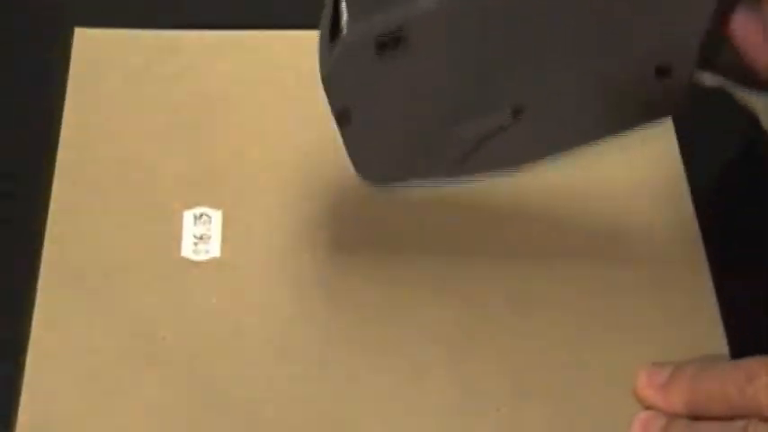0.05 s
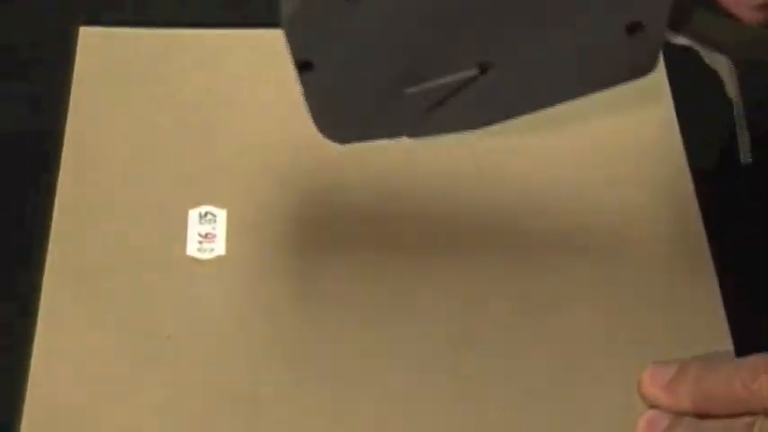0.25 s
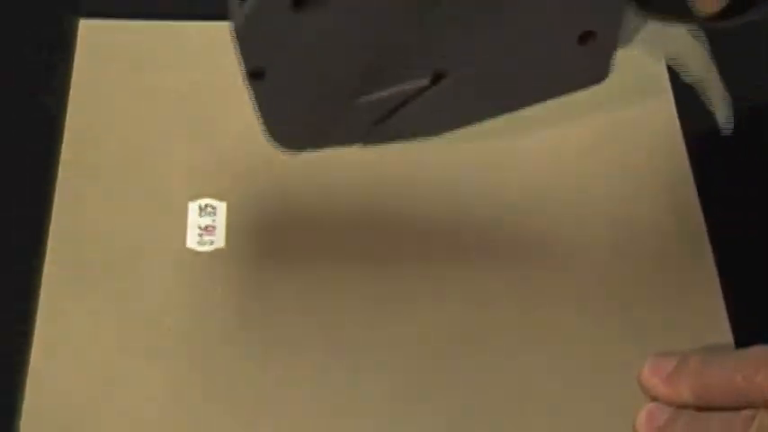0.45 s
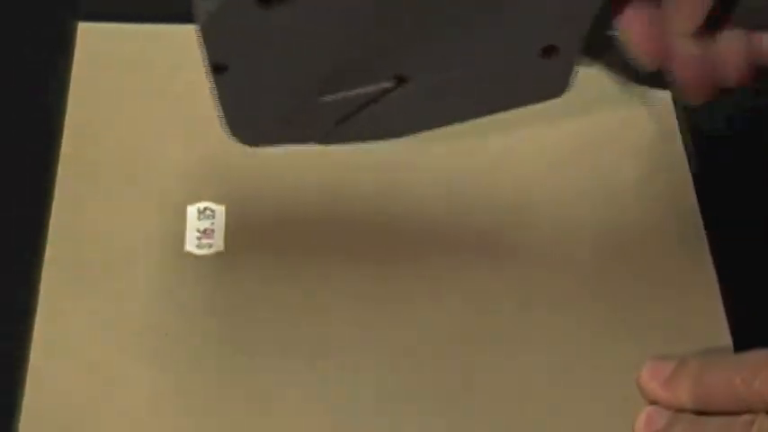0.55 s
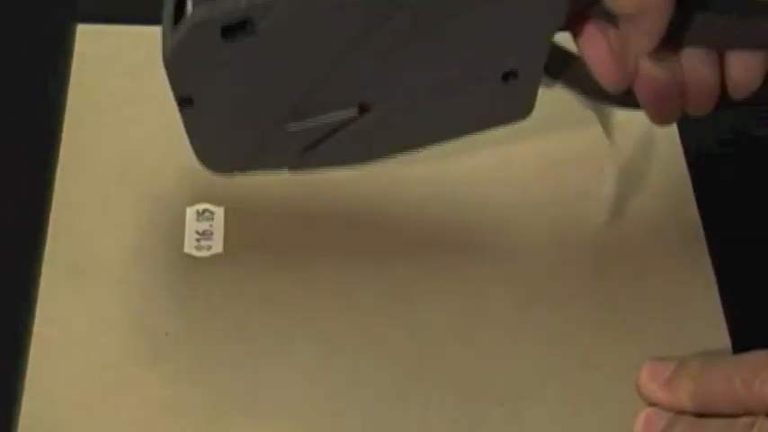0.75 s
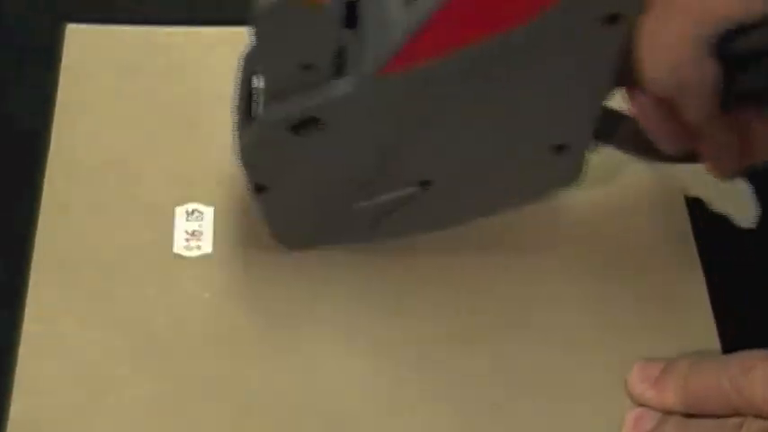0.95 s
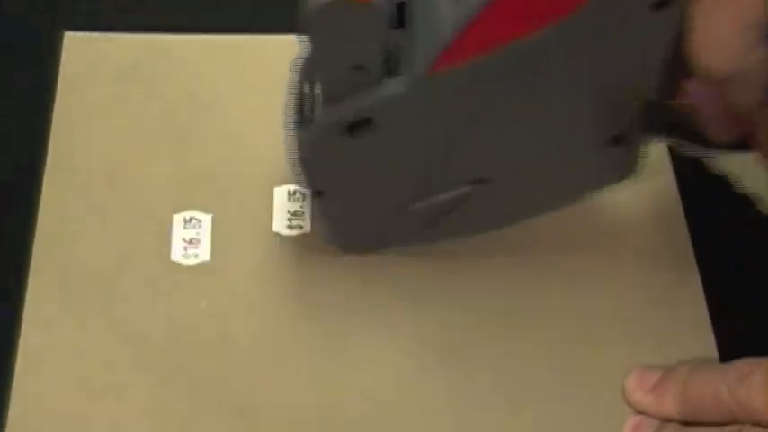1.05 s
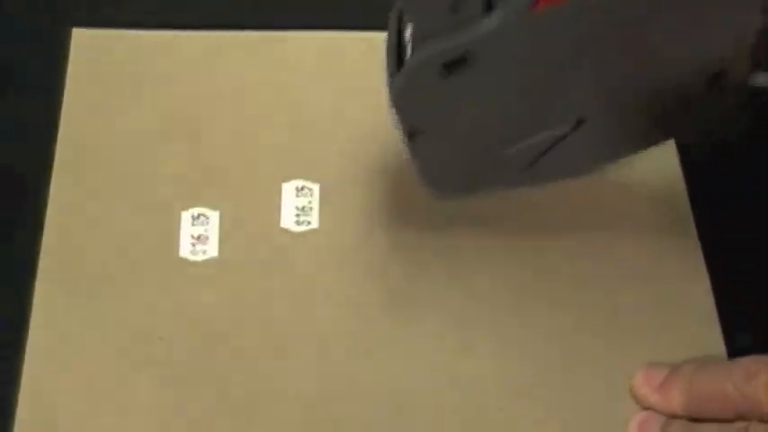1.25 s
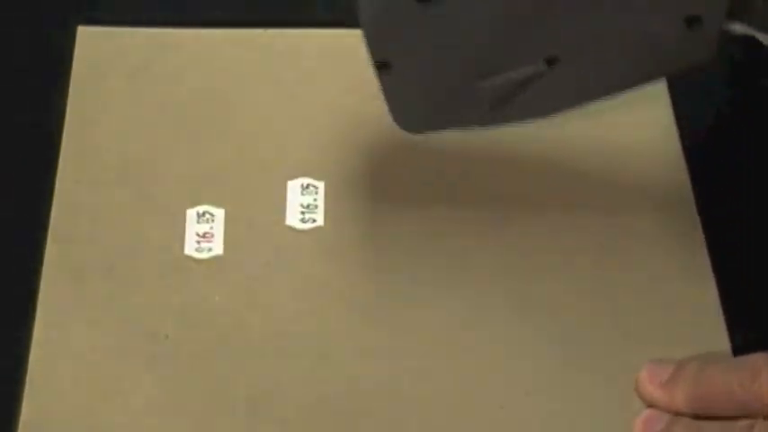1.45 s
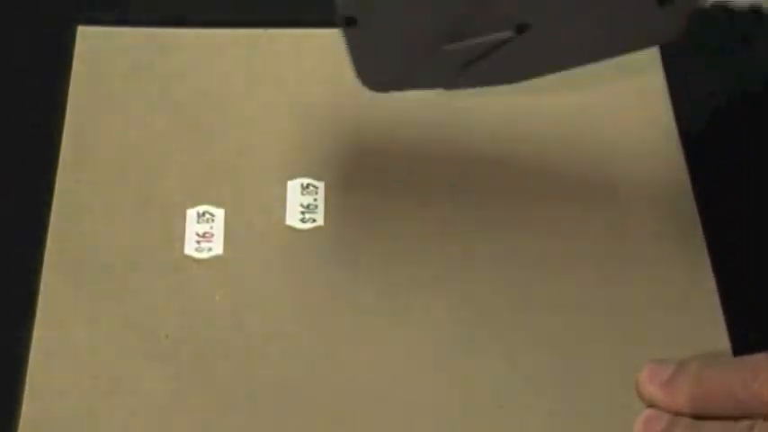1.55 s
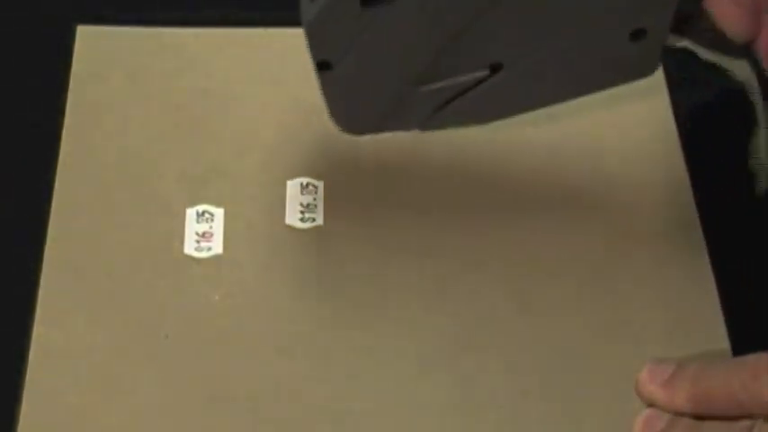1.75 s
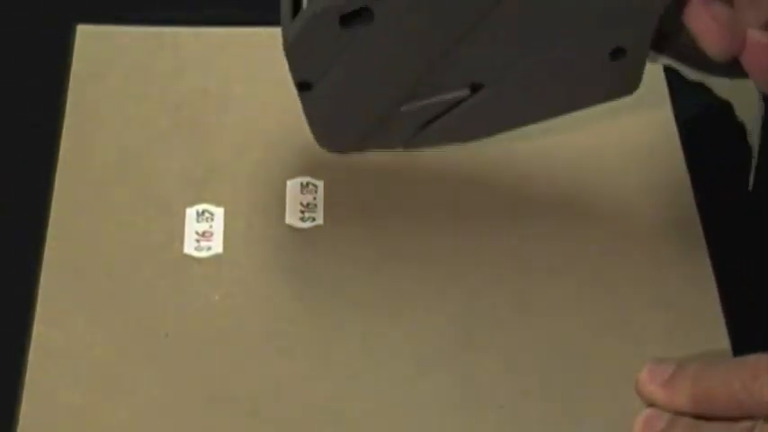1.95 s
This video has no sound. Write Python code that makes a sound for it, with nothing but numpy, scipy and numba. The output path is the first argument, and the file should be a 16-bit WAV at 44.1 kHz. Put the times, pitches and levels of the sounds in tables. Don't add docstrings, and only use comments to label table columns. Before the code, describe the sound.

A plastic label gun clacks very close to a camera microphone in a small hard room. Low hum and a faint distant squeak open; a squeeze snaps loudly at 0.42 seconds, and a ratcheting release at 0.6 leaves springs ringing. Backing paper rustles from 0.86, the gun thumps the table at 1.0, soft scuffs follow, then a second loud snap at 1.62 and a lighter release around 1.8.

```python
import sys
import numpy as np
from scipy import signal
from scipy.fft import rfft, irfft
from scipy.io import wavfile
from scipy.ndimage import uniform_filter1d, minimum_filter1d
from numba import njit

SR = 44100
rng = np.random.default_rng(int(sys.argv[2]) if len(sys.argv) > 2 else 0)


def undo_db(level):
    steps = np.asarray(level, float) / 20
    return 10 ** steps


def master_out(mix):
    frames = np.transpose(np.atleast_2d(mix))
    ceiling = np.clip(frames, -1, 1)
    pcm = np.round(ceiling * 32767).astype(np.int16)
    wavfile.write(sys.argv[1], SR, pcm)


N = 88861
PRE = 8820
GUN_Q = 2.6

# [f/Hz, level/dB]
CONTACT_TONE = [(120, -69), (200, -20.5), (537, -11.5), (1580, -6), (1900, -6.5), (2120, -5), (5580, -7),
                (7470, -8), (15800, -26)]


def at(table, hz, col=1):
    rows = np.array(table, float)
    return np.interp(np.log(np.maximum(hz, 1)), np.log(rows[:, 0]), rows[:, col])


def shape(x, gain):
    n = x.shape[-1]
    return irfft(rfft(x) * gain(np.arange(n // 2 + 1) * SR / n), n)


def unit(x):
    return x / np.sqrt(np.mean(x ** 2))


def noise():
    return rng.standard_normal(N + PRE)


def bell(hz, centre_hz, q):
    return 1 / np.sqrt(1 + (q * (hz / centre_hz - centre_hz / np.maximum(hz, 1))) ** 2)


def decay(t, t60):
    return 1000. ** (-t / t60)


def ring(x, modes):
    t = np.arange(SR // 2) / SR
    body = sum(undo_db(db) * np.sin(2 * np.pi * hz * t) * decay(t, t60) for hz, db, t60 in modes)
    return signal.fftconvolve(x, body)[:len(x)]


def add(track, s, piece):
    i = PRE + int(s * SR)
    track[i:i + len(piece)] += piece[:len(track) - i]


def burst(ms, hz, wide_db, q):
    def colour(f):
        floor = undo_db(wide_db) / (1 + (f / hz / 3) ** 4)
        return undo_db(at(CONTACT_TONE, f)) * (bell(f, hz, q) + floor)

    t = np.arange(4096) / SR * 1000 / ms
    x = rng.standard_normal(4096) * t * np.exp(-t * 2)
    tones = rfft(x)
    size = np.abs(tones)
    x = irfft(tones / (size + .25 * size.mean())) * np.exp(-t * .8)
    x = np.roll(shape(np.roll(x, 64), colour), -32)
    return x / np.abs(x).max()


def hum():
    # [f/Hz, level/dB]
    floor = [(12, -33), (20, -5), (165, -7), (386, -18), (551, -20.5), (1120, -28), (6150, -35.5),
             (11900, -36.5), (14000, -105)]
    # [f/Hz, width/Hz, level/dB]
    drones = [(26.24, 2.4, -40.5), (91.2, 4.4, -49.5), (131.5, 7, -57), (168, 12.5, -43)]
    x = undo_db(-41.5) * unit(shape(noise(), lambda f: undo_db(at(floor, f)) * (f > 15)))
    for hz, width_hz, db in drones:
        x = x + undo_db(db) * unit(shape(noise(), lambda f: bell(f, hz, hz / width_hz) ** 2))
    return x


def squeak():
    # [t/s, f/Hz, level/dB]
    path = [
        (.04, 6470, -49),
        (.06, 6210, -58),
        (.11, 6560, -56.5),
        (.19, 6500, -60),
        (0.228, 6180, -58),
        (.28, 5740, -68),
        (.3, 5900, -97),
    ]
    t = (np.arange(N + PRE) - PRE) / SR
    s, hz, db = np.array(path).T
    flutter_db = 2.4 * unit(uniform_filter1d(noise(), size=300))
    level = np.sqrt(2) * undo_db(np.interp(t, s, db, -120, -120) + flutter_db)
    phase = 2 * np.pi * np.cumsum(np.interp(t, s, hz)) / SR
    return level * np.sin(phase)


def snaps():
    # [t/s, level/dB, f/Hz, length/ms]
    pawl = [(-.06, -2, 2380, 11.9), (0.075, -34.5, 1940, 8.2), (0.3865, -20.5, 1290, 3.3),
            (0.402, -14, 1520, 1.2), (.4155, -4, 3400, 2.1), (0.419, 17.5, 7140, 2.8),
            (.4195, 19.5, 2730, 3.3), (.4222, 22, 3000, 1.9), (0.4283, 21.5, 1900, 2.24),
            (.4305, 16.5, 3540, 2.7), (.4297, 14, 7500, 2.2), (.571, -16, 1200, 1.5),
            (0.5962, 0.5, 3060, 1.16), (.6138, -8.5, 1300, 2.4), (0.6205, 10.5, 6200, 3.2),
            (.623, 3.5, 3000, 3.6), (.6345, 0, 4500, 1.3), (0.6357, 9.5, 1910, 1.57),
            (.6645, -6, 1500, 1.5), (.694, -9, 2500, 1.5), (.9945, 5, 2450, 2.56), (.995, 1.5, 4400, 1.2),
            (.9945, 0, 7600, 2.3), (.9985, 5, 1020, 3), (.999, 4.5, 2710, 1.8), (1.0135, -4, 1960, 4.3),
            (1.1115, -18, 1200, 1.5), (1.251, -19, 4970, 7.5), (1.301, -31.5, 1510, 6.9),
            (1.5855, -15, 1330, 4.2), (1.5985, -12, 4200, 2), (1.6095, -12, 1800, 1.5),
            (1.614, 6.5, 2310, 1.43), (1.616, 20, 2600, 3.5), (1.6165, 19.5, 7460, 2.5),
            (1.6255, 18, 4000, 2.6), (1.626, 18, 1720, 2.35), (1.7902, -6.5, 3030, 2.1),
            (1.7935, -3.5, 6440, 2.9), (1.796, -4, 2000, 3.4), (1.808, -10, 6500, 2.8),
            (1.8228, 7.5, 6600, 1.6), (1.8228, 5.5, 2780, 2.4), (1.8253, 10, 2860, 1.3),
            (1.8465, -4, 1800, 3.5)]
    x = np.zeros(N + PRE)
    for s, db, hz, ms in pawl:
        add(x, s - .001, undo_db(db) * burst(ms, hz, -17, GUN_Q))
    return x


def rattles():
    # [start t/s, end t/s, first level/dB, last level/dB, f/Hz]
    runs = [(0.38, 0.402, -50, -20.5, 3500), (0.396, 0.414, -31, -16, 8000),
            (0.403, 0.414, -25.5, -16.5, 3000), (0.422, 0.427, 10, 9, 3530), (0.431, 0.462, 8.5, -19, 2740),
            (0.595, 0.622, -6, -14.5, 3370), (.624, 0.637, -6.5, -21.5, 3050),
            (1.583, 1.605, -32, -25, 3880), (1.605, 1.62, -22, -20, 4000), (1.619, 1.628, 6, 1, 3530),
            (1.63, 1.658, 9, -30, 3350), (1.7908, 1.823, -13, -19, 2010), (1.824, 1.842, -7, -15, 2250),
            (1.839, 1.949, -13, -48.5, 2000), (0.636, 0.741, -11.5, -50, 1810),
            (0.993, 1.035, -7, -30, 3200), (1.029, 1.216, -39, -45, 1200), (1.193, 1.293, -41, -43, 2210),
            (1.252, 1.285, -43, -52, 5100)]
    teeth_per_s, scatter_db, tooth_ms = 7000, 2.5, .35
    x = np.zeros(N + PRE)
    tooth = np.exp(-np.arange(128) / (tooth_ms * SR / 1000))
    for s0, s1, db0, db1, hz in runs:
        chance = rng.random((2, 9216))
        n = int((s1 - s0) * SR)
        strength = undo_db(-scatter_db * np.log(chance[1] + 1e-9))
        teeth = (chance[0] < teeth_per_s / SR) * strength
        run = np.convolve(teeth, tooth)[:9216] * rng.standard_normal(9216)
        run = unit(shape(run, lambda f: undo_db(at(CONTACT_TONE, f)) * (bell(f, hz, GUN_Q) + undo_db(-6.0))))
        add(x, s0, run[:n] * undo_db(np.linspace(db0, db1, n)))
    return x


def gun():
    # [f/Hz, level/dB, t60/s]
    shell = [(1060, -4, .02), (1250, -2, .02), (1700, -2, .02), (2090, -2, .02), (2760, 0, .015),
             (3300, -2, .015), (4000, -2, .015), (5200, -4, .012), (7500, -2, .01)]
    x = snaps() + rattles()
    return x + undo_db(-51.5) * ring(x, shell)


def springs():
    # [t/s, level/dB, t60/s]
    rings = [(.636, -18, 0.45), (.636, -14.5, 0.34), (.65, -15.5, 0.21), (.636, -13, .15),
             (.636, -26, 0.27), (.43, -21, 0.18), (1.795, -21.5, 0.24), (1.826, -17, 0.29),
             (1.847, -25, 0.23), (1.847, -22.5, 0.29), (1.847, -27, 0.25), (1.847, -33, 0.2),
             (1.0, -12, 0.13), (1.0, -17.5, 0.16)]
    pitches = [1303, 1257, 1095, 1753, 5275, 355, 2085, 2095, 2207, 1276, 974, 1685, 1190, 544]
    x, t = np.zeros(N + PRE), np.arange(SR) / SR
    for (s, db, t60), hz in zip(rings, pitches):
        flutter_db = 3.5 * unit(uniform_filter1d(rng.standard_normal(SR), size=350))
        add(x, s, undo_db(db + flutter_db) * np.sin(2 * np.pi * hz * t) * decay(t, t60))
    return x


def table():
    # [t/s, level/dB, contact/ms]
    blows = [
        (.9945, 6, .9),
        (.9995, -2, .9),
        (1.06, -12, 2),
        (1.1, -7, 2),
        (1.21, -28, 2.5),
        (.571, -28, .6),
        (.612, -30, .6),
        (.416, -28, .6),
        (1.613, -24, .6),
        (1.81, -30, .6),
    ]
    # [f/Hz, level/dB, t60/s]
    top = [(140.2, -6, 0.34), (194, -1.5, 0.43), (240.7, -7, 0.17), (278, -4, 0.32), (346.7, 0, 0.078),
           (403.4, 0.5, 0.063), (444, -10, 0.084), (640, -9, 0.049), (1020, 1, 0.059)]
    push = np.zeros(N + PRE)
    for s, db, ms in blows:
        blow = np.hanning(int(ms * SR / 1000) + 2)
        add(push, s, undo_db(db) * blow / blow.sum())
    low_cut = signal.butter(2, 109, "high", fs=SR, output="sos")
    return signal.sosfilt(low_cut, undo_db(-5) * ring(push, top))


def paper():
    # [t/s, level/dB, f/Hz, length/ms]
    scuffs = [(0.86, -32, 5540, 14), (0.882, -30, 8000, 11), (0.896, -32, 8000, 8.8),
              (0.908, -33.5, 3770, 21), (0.927, -21.5, 7800, 2.6), (.928, -33, 3530, 16),
              (0.947, -28, 6530, 15), (0.97, -28.5, 9000, 11), (0.977, -22, 4630, 18),
              (0.992, -12, 3000, 4), (1.125, -27, 8240, 8.5), (1.207, -26.5, 8000, 3.1),
              (1.22, -26, 2970, 12), (1.243, -21, 4630, 3.4), (1.256, -31, 5050, 14)]
    x = np.zeros(N + PRE)
    for s, db, hz, ms in scuffs:
        add(x, s, undo_db(db) * burst(ms, hz, -14, 3.))
    return x


def room(x):
    # [f/Hz, t60/s, level/dB]
    bands = [(133, 0.65, 7), (255, 0.37, -8), (526, 0.5, -3), (968, 0.31, 7.5), (2000, 0.12, -9),
             (4300, 0.34, -3.5), (8000, 0.23, -3), (14100, 0.061, 5)]
    delay_s = .004
    t = np.arange(SR * 3 // 4) / SR
    tail = np.zeros(len(t))
    for hz, t60, db in bands:
        band = shape(rng.standard_normal(len(t)), lambda f: bell(f, hz, 0.77) ** 2)
        tail += undo_db(db) / np.sqrt(t60) * decay(t, t60) * band
    tail *= np.clip(t / delay_s - 1, 0, 1)
    return undo_db(-10.5) * signal.fftconvolve(x, tail / np.sqrt(np.sum(tail ** 2)))[:len(x)]


def spread(mid, side, db):
    # [f/Hz, side minus mid level/dB]
    width = [(60, -19.5), (110, -24.5), (200, -21), (380, -16), (700, -13), (1290, -14), (2380, -11),
             (4400, -7.5), (8120, -2.5), (15000, -4)]
    lean = 0.17 * shape(mid, lambda f: 1 / (1 + (f / 69) ** 2))
    side = shape(side, lambda f: undo_db(at(width, f) + db)) + lean
    return np.array([mid + side, mid - side])


def scene():
    background = spread(hum() + squeak(), hum(), 5.4)
    clicks, rings, top = gun(), springs(), table()
    far = clicks + paper() + .5 * top
    near = far + rings + .5 * top
    skew = shape(near, lambda f: -1j)
    mix = spread(near, skew, -5) + spread(room(far), room(far), 0.5) + background
    return mix[:, PRE:]


@njit
def duck(over_db, attack, release):
    cut, r = np.empty(len(over_db)), 0.
    for i in range(len(over_db)):
        if over_db[i] > r:
            r = r + (over_db[i] - r) * attack
        else:
            r = max(r - release, 0.)
        cut[i] = r
    return cut


def top_cut(x):
    return signal.sosfilt(signal.butter(12, 15970, fs=SR, output="sos"), x)


def record(dry):
    ceiling_db, attack_ms, release_db_s = -2, 0.4, 143
    mic_top_hz, steepness = 10600, 9
    dry = shape(dry, lambda f: 1 / np.sqrt(1 + (f / mic_top_hz) ** (2 * steepness)))
    peak = -minimum_filter1d(-np.abs(dry).max(axis=0), size=23)
    over_db = 20 * np.log10(peak + 1e-9) - ceiling_db
    cut_db = duck(over_db, min(1000 / (attack_ms * SR), 1.), release_db_s / SR)
    return top_cut(np.clip(dry * undo_db(-cut_db), -1, 1))


dry = scene()
out = record(dry)
master_out(out)
```